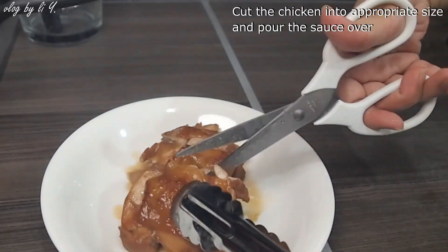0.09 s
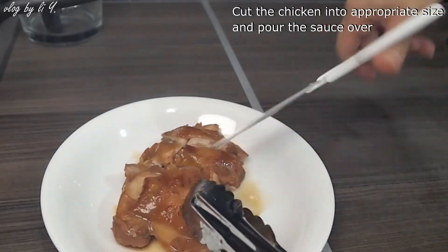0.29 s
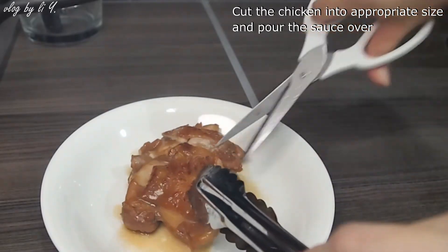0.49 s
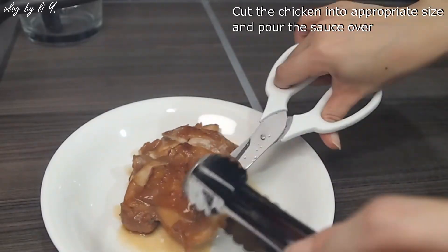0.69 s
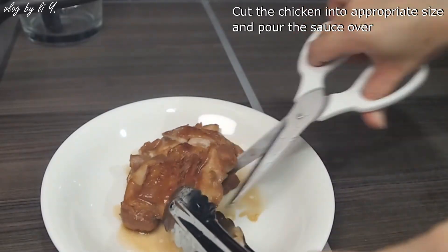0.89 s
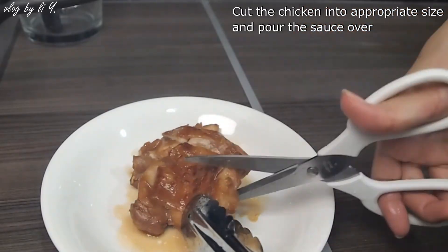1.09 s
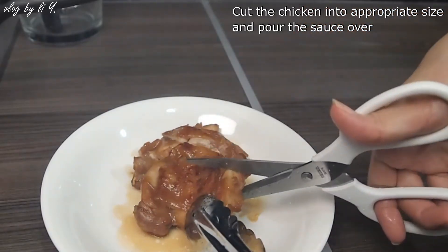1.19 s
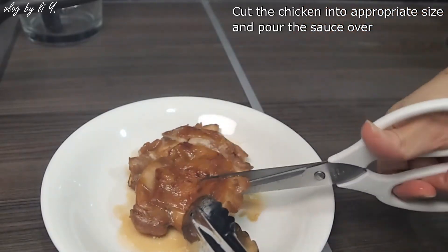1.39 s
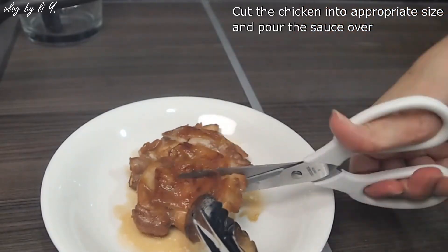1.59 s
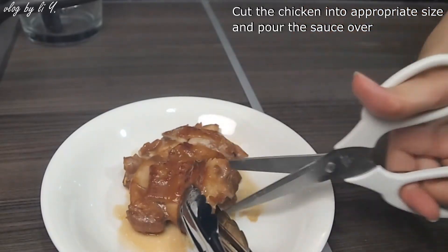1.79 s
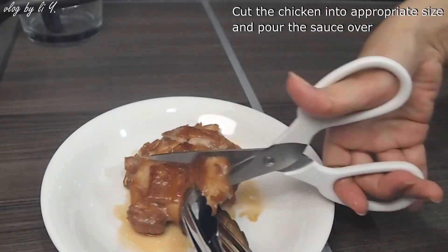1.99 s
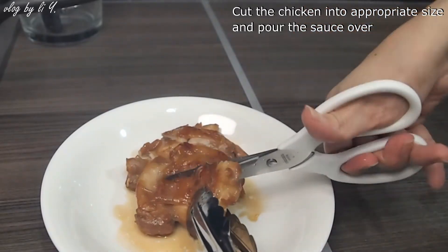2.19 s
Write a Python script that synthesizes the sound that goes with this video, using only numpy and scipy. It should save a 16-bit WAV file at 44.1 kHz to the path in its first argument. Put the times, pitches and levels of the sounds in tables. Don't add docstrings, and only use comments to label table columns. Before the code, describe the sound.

Metal utensils clack on a ceramic plate, which rocks faintly to rest; a second knock follows, then a short scrape with soft meat squash, a tap and a scissor snip, close up in a hard-walled kitchen with fridge hum.

```python
import sys
import numpy as np
from scipy import signal
from scipy.fft import rfft, irfft
from scipy.io import wavfile
from scipy.ndimage import uniform_filter1d

SR = 44100
rng = np.random.default_rng(int(sys.argv[2]) if len(sys.argv) > 2 else 0)


def decibels_to_gain(level_db):
    exponent = np.asarray(level_db, float) / 20
    return 10 ** exponent


def transcribe(u):
    v = np.clip(np.atleast_2d(u).T, -1, 1)
    q = np.round(v * 32767).astype(np.int16)
    wavfile.write(sys.argv[1], SR, q)


N = 97020


def ring(modes):
    hz, db, t60 = np.transpose(modes)[:, :, None]
    t = np.arange(SR // 2) / SR
    partials = decibels_to_gain(db - 60 * t / t60) * np.sin(2 * np.pi * hz * t)
    return partials.sum(0)


def knock(modes, level_db, crack_db, contact_s, thud_db):
    crack_t60, thud_t60, thud_rise_s = 0.052, 0.15, 0.0033
    t = np.arange(SR // 2) / SR
    crack_noise, thud_noise = rng.standard_normal((2, len(t)))
    crack = decibels_to_gain(crack_db - 60 * t / crack_t60) * band(crack_noise, 1370, 8760)
    thud = decibels_to_gain(thud_db - 60 * t / thud_t60) * evened(band(thud_noise, 522, 1300))
    thud *= 1 - np.exp(-t / thud_rise_s)
    contact = 1 - np.exp(-t / contact_s)
    return decibels_to_gain(level_db) * contact * (ring(modes) + crack + thud)


def scrape():
    # (time [s], drag on the glaze [dB], squash of the meat [dB])
    rub = [
        (1.262, -77, -73),
        (1.275, -58, -52),
        (1.31, -63, -52.5),
        (1.343, -52, -47),
        (1.346, -48.5, -45),
        (1.40, -66, -51),
        (1.46, -51, -44.5),
        (1.49, -38.5, -44),
        (1.56, -77, -53.5),
    ]
    # (frequency [Hz], level [dB], t60 [s])
    rubbed_modes = [(1529, -15, 0.63), (2360, -8, 0.067), (2525, -14, 0.1), (3430, -17, .05),
                    (4160, -7, 0.042), (6170, -7, 0.021), (6780, -17, .1)]
    grains_per_s, spread_db = 1400, 3
    s, drag_db, squash_db = np.transpose(rub)
    t = np.arange(N) / SR
    size = decibels_to_gain(spread_db * np.minimum(rng.exponential(1, N), 4)) * rng.choice([-1., 1.], N)
    grains = evened(size * (rng.random(N) < grains_per_s / SR))
    drive = grains * decibels_to_gain(np.interp(t, s, drag_db, -150, -150))
    rubbed = signal.fftconvolve(drive, ring(rubbed_modes))[:N] / 10
    rustle = evened(band(rng.standard_normal(N) + .5 * grains, 350, 1440))
    return rubbed + decibels_to_gain(np.interp(t, s, squash_db, -150, -150)) * rustle


def tick(level_db, centre_hz, octaves, t60):
    rise_s, fade_s = 0.00052, 0.02
    t = np.arange(SR // 10) / SR
    hz = np.fft.rfftfreq(len(t), 1 / SR) + 1
    bell = np.exp(-.5 * (np.log2(hz / centre_hz) / octaves) ** 2)
    noise = evened(irfft(rfft(rng.standard_normal(len(t))) * bell, len(t)))
    ends = np.minimum(t / rise_s, 1) * np.minimum((t[-1] - t) / fade_s, 1)
    return decibels_to_gain(level_db - 60 * t / t60) * ends * noise


def kitchen(x):
    # (frequency [Hz], t60 [s])
    room_decay = [(300, 0.63), (1000, 0.51), (2400, 0.48), (6400, 0.38), (12000, 0.65)]
    room_db, gap_s = -6.5, 0.0017
    taps = np.zeros(SR)
    at = np.arange(0, SR - 20, 20)
    taps[at + rng.integers(0, 20, len(at))] = rng.choice([-1., 1.], len(at))
    hz, t, spectrum = signal.stft(taps, SR, nperseg=256)
    decay = decibels_to_gain(-60 * t / read(room_decay, hz)[:, None])
    tail = signal.istft(spectrum * decay, SR, nperseg=256)[1]
    tail = tail * (1 - np.exp(-np.arange(len(tail)) / SR / gap_s))
    return decibels_to_gain(room_db) * signal.fftconvolve(x, tail / np.linalg.norm(tail))[:N]


def fridge_hum():
    # (frequency [Hz], level [dB], waver width [Hz], waver share [ratio])
    hum_lines = [(99.5, -45.5, 6.6, 0.1), (147, -55.5, 28, 1.3), (274, -60, 17, 2.3), (584, -60.5, 41, 2.2),
                 (39, -53.5, 13, 5), (82, -60.5, 2.9, 1.8)]
    t = np.arange(N) / SR
    hum = np.zeros(N)
    for hz, db, width, share in hum_lines:
        r = np.exp(-np.pi * width / SR)
        noise = rng.standard_normal(N) + 1j * rng.standard_normal(N)
        waver = evened(signal.lfilter([1], [1, -2 * r, r * r], noise))
        line = (1 + share * waver) * np.exp(2j * np.pi * hz * t)
        hum += decibels_to_gain(db) * evened(line.real)
    return hum


def whine():
    # (time [s], level [dB])
    whine_drift = [(0, -51), (.6, -57), (1.1, -55), (1.5, -51.5), (1.9, -57), (2.05, -55), (2.2, -63)]
    whine_hz, flicker_db, flicker_s = 15389.3, 0.5, 0.018
    t = np.arange(N) / SR
    flicker = evened(uniform_filter1d(rng.standard_normal(N), int(flicker_s * SR) + 1))
    level_db = np.interp(t, *np.transpose(whine_drift)) + flicker_db * flicker
    return decibels_to_gain(level_db) * np.sqrt(2) * np.sin(2 * np.pi * whine_hz * t)


def hiss():
    # (frequency [Hz], density [dB per Hz])
    air_spectrum = [(12, -15), (20, -28), (68, -9.5), (104, -4.5), (193, -10), (277, -10.5), (310, -10),
                    (5530, -38), (16000, -31.5)]
    colour = decibels_to_gain(read(air_spectrum, np.fft.rfftfreq(N, 1 / SR)))
    return decibels_to_gain(-43.5) * evened(irfft(rfft(rng.standard_normal(N)) * colour, N))


def evened(x):
    return x / np.sqrt(np.mean(abs(x) ** 2) + 1e-20)


def read(points, hz):
    f, value = np.transpose(points)
    return np.interp(np.log(hz + 1), np.log(f + 1), value)


def band(x, lo_hz, hi_hz):
    return signal.sosfilt(signal.butter(3, [lo_hz, hi_hz], "band", fs=SR, output="sos"), x)


def add(mix, s, sound):
    part = mix[round(s * SR):][:len(sound)]
    part += sound[:len(part)]


def scene():
    # (frequency [Hz], level [dB], t60 [s])
    rim_modes = [(740, -29, .15), (1035, -6.5, 0.019), (1229, -21.5, 0.046), (1523, -43, 0.97),
                 (2340, -1.5, 0.064), (2490, -46, 0.47), (2630, -30, 0.021), (4140, -15, 0.025),
                 (6354, -0.5, 0.021), (6340, -33, 0.23), (6820, -12.5, 0.11), (8060, -34, 0.082),
                 (8780, -27, 0.093), (10970, -22.5, 0.037)]
    well_modes = [(735, -15.5, 0.099), (999, -11.5, 0.039), (1523, -45, 0.82), (1810, -16.5, 0.045),
                  (2357, -3, 0.02), (2420, -29, 0.39), (4124, -30, 0.083), (4500, -40, 0.034),
                  (2830, -14.5, 0.02), (6316, 4.5, 0.017), (2265, -13.5, 0.051), (8090, -24, .05),
                  (8810, -32.5, .12), (11030, -26, 0.063)]
    rocking_modes = [(2253, -3.5, 0.056), (2516, -14, 0.079), (2290, -26, 0.041)]
    tongs_modes = [(713, -7, 0.027), (1124, -1, .03), (1420, -45, .3), (2440, -14, 0.033),
                   (2550, -17.5, 0.23), (4070, -8, 0.037), (6120, 3, 0.022), (6370, 3, 0.06),
                   (6520, -9, 0.13), (6770, -5, 0.056), (8500, -4, 0.011), (10600, -5, 0.013)]
    # (time [s], level [dB], crack [dB], contact [s], thud [dB])
    rim_hits = [
        (.2157, -5, -20.5, 0.00067, -22.5),
    ]
    well_hits = [
        (0.7541, -6, -15, 0.0009, -21.5),
    ]
    rock_hits = [
        (.2705, -19, -30, 0.0025, -28),
        (.342, -44, -30, 0.0031, -34),
        (.405, -38, -30, .004, -30),
        (.467, -32.5, -30, 0.0079, -10),
        (.522, -27.5, -30, 0.01, -30),
        (.572, -33.5, -30, 0.004, -13.5),
    ]
    tap_hits = [
        (1.344, -57, -20, 0.0013, 21.5),
        (1.474, -26.5, -7, 0.0028, -6),
        (1.501, -40, -7, 0.0017, -12),
    ]
    # (time [s], level [dB], centre [Hz], width [octaves], t60 [s])
    noise_bursts = [(.416, -50, 6740, 0.32, 0.13), (.498, -47, 3300, .35, .005), (.529, -48, 8800, 0.28, 0.026),
                    (1.3455, -29.5, 900, .35, 0.035), (1.591, -41.5, 5000, 0.87, 0.011),
                    (1.7273, -39.5, 6500, 0.11, 0.022), (1.7285, -43, 11100, .15, .012),
                    (1.771, -53.5, 6060, 0.26, 0.24), (1.781, -42.5, 2350, 0.28, 0.024),
                    (1.781, -49, 9900, 0.32, 0.035), (1.849, -54.5, 2280, 0.11, 0.14),
                    (1.929, -46, 8700, 0.61, 0.086), (1.9442, -25.5, 2320, 0.26, 0.013),
                    (1.9444, -27, 3900, 0.084, 0.021), (1.948, -40.5, 4270, 0.63, 0.097),
                    (1.9428, -37, 4460, 0.13, .012), (1.9434, -36.5, 6200, 0.14, 0.025),
                    (1.9435, -31, 10100, .12, .015), (2.067, -57, 6300, 0.16, 0.23),
                    (.2175, -31.5, 303, 0.65, 0.063),
        (.2162, -34, 12400, 0.32, .015),
        (.46, -55.5, 6440, 0.047, 0.62),
        (.525, -56, 6380, 0.052, 0.27),
        (.7545, -42, 350, 0.56, .08),
        (.7545, -32, 12800, 0.33, .015),
        (1.468, -41, 4300, .5, 0.057),
        (1.53, -39, 313, 0.35, .08),
    ]
    near, ticks = scrape(), np.zeros(N)
    for modes, hits in ((rim_modes, rim_hits), (well_modes, well_hits),
                        (rocking_modes, rock_hits), (tongs_modes, tap_hits)):
        for s, *blow in hits:
            add(near, s, knock(modes, *blow))
    for s, *snap in noise_bursts:
        add(ticks, s, tick(*snap))
    reverberation = kitchen(near + decibels_to_gain(-2) * ticks)
    return (near + ticks + reverberation + fridge_hum() + whine() + hiss())[None]


def roll_off(x):
    return signal.sosfilt(signal.butter(12, 16830, fs=SR, output="sos"), x)


def record(dry):
    notch_hz, notch_width_hz, notch_depth, edge_hz = 7900, 70, .85, 15750
    hz = np.fft.rfftfreq(N, 1 / SR)
    notch = 1 - notch_depth / (1 + ((hz - notch_hz) / notch_width_hz) ** 2)
    treble_cut = 1 / (1 + (hz / edge_hz) ** 120)
    mix = irfft(rfft(dry) * notch * treble_cut, N)
    return roll_off(mix)


dry = scene()
out = record(dry)
transcribe(out)
```